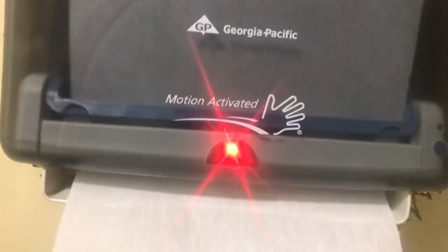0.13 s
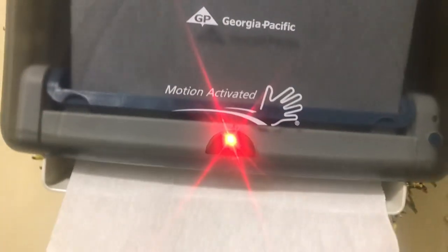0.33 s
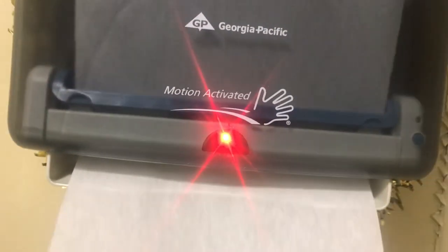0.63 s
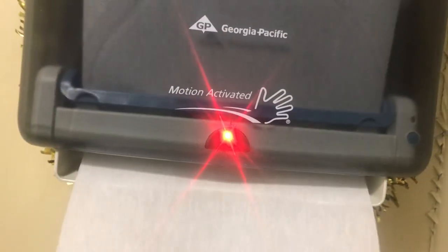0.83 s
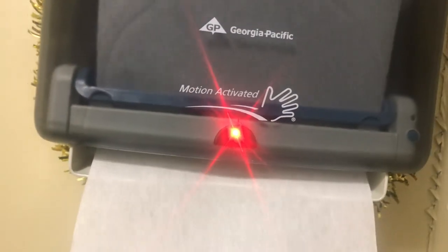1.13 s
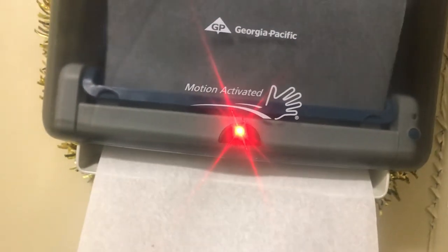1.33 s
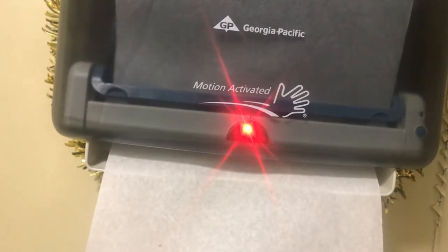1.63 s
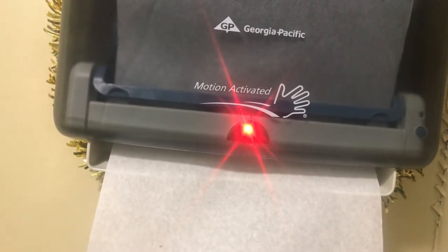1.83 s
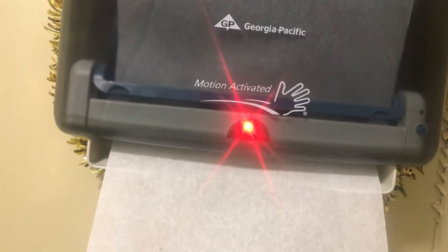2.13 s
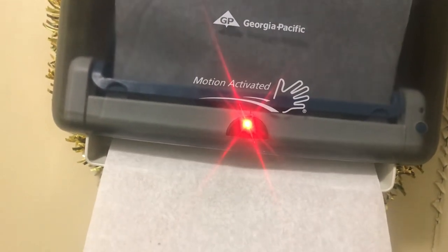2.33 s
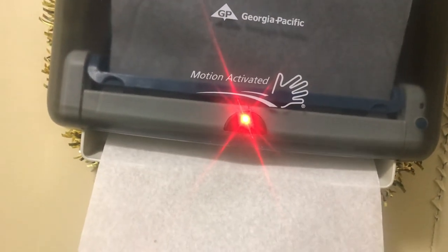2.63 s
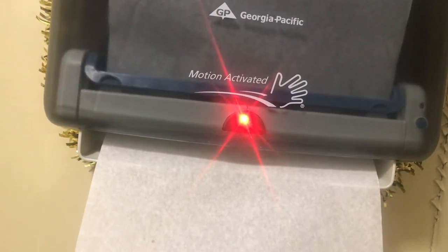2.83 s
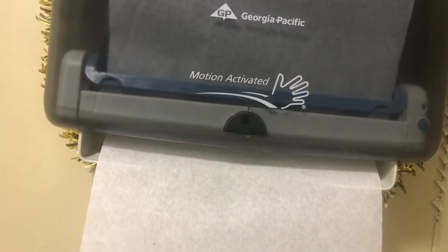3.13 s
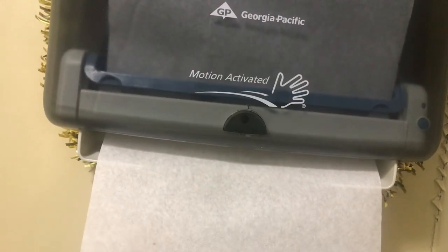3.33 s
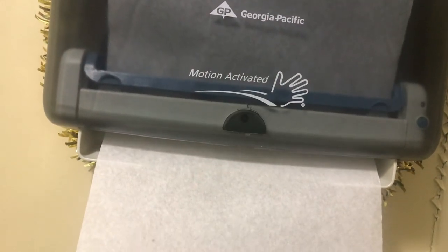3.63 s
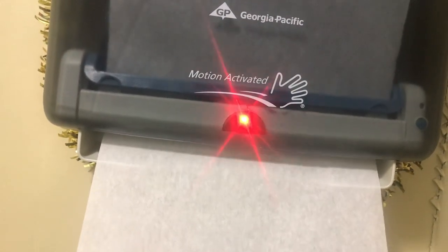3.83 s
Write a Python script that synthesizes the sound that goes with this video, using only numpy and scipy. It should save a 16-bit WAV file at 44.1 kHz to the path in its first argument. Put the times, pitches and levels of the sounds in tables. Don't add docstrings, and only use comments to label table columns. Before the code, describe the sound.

Geared dispenser motor feeds paper with a buzzing whine, winds down, followed by clicks and a brief restart

```python
import sys
import numpy as np
from scipy import signal
from scipy.fft import rfft, irfft, next_fast_len
from scipy.io import wavfile
from scipy.ndimage import map_coordinates

SR = 44100
rng = np.random.default_rng(int(sys.argv[2]) if len(sys.argv) > 2 else 0)


def bounce(signal):
    frames = np.transpose(np.atleast_2d(signal))
    limited = np.clip(frames, -1, 1)
    pcm = np.round(limited * 32767).astype(np.int16)
    wavfile.write(sys.argv[1], SR, pcm)


def magnitude_from_level(level_db):
    exponent = np.asarray(level_db, float) / 20
    return 10 ** exponent


N = 176400
T = np.arange(N) / SR
OFF_S, ON_S = 1.186, 3.872
OFF = np.clip(T - OFF_S, 0, None)
ON = np.clip(T - ON_S, 0, None)
FIRST = T < (OFF_S + ON_S) / 2
GRIP_S = 3.897
AGAIN = ~FIRST * magnitude_from_level(2.5) * np.clip((T - GRIP_S) / 0.012, 0, 1)
TEETH = 8
RATTLE_S, RATTLE_FADE_DB = 0.25, -22

# f/Hz, width/Hz, level/dB
HOUSING = [(130.3, 9.7, 6.5), (254, 24, 3), (557, 70, -3.5), (840.6, 17.4, 1), (1120, 190, 0),
           (1275, 49, 4.5), (1600, 210, -7), (2800, 150, -10.5)]


def unit(x):
    return x / np.sqrt(np.mean(x ** 2) + 1e-20)


def along(points, hz):
    f, v = np.transpose(points)
    return np.interp(np.log(hz + 1), np.log(f + 1), v)


def curves(rows):
    s, *cols = np.transpose(rows)
    return [np.interp(T, s, c) for c in cols]


def wobble(rate):
    knots = rng.standard_normal(int(N * rate / SR) + 4)
    return map_coordinates(knots, [np.arange(N) * rate / SR])


def filtered(x, response):
    m = next_fast_len(N + SR // 2)
    return irfft(rfft(x, m) * response(np.fft.rfftfreq(m, 1 / SR)), m)[..., :N]


def noise(spectrum):
    return unit(filtered(rng.standard_normal(N), lambda hz: magnitude_from_level(along(spectrum, hz))))


def resonate(x, peaks):
    def gain(f):
        total = 0
        for k, (centre, width, db) in enumerate(peaks):
            damping = 1j * f * width
            total = total + (-1) ** k * magnitude_from_level(db) * damping / (centre * centre - f * f + damping)
        return total

    return filtered(x, gain) / np.sqrt(np.mean(np.abs(gain(np.linspace(1, SR / 2, 4000))) ** 2))


def ventilation():
    # f/Hz, level/dB per Hz
    air = [(20, -71), (45, -10), (80, 1), (330, -17), (1120, -24.5), (5000, -35), (12000, -39.5),
           (16000, -38)]
    return magnitude_from_level(-62 + 0.27 * wobble(5.54)) * noise(air)


def shaft():
    # t/s, mesh f/Hz, mesh level/dB
    feed = [
        (0.01, 1110, -34.5),
        (0.052, 1127, -35),
        (0.232, 1120, -29.5),
        (0.5, 1126, -35.5),
        (0.532, 1121, -28),
        (0.728, 1120, -32.5),
        (0.922, 1131, -24.5),
        (1.026, 1129, -29),
        (1.185, 1122, -24),
    ]
    mesh_hz, mesh_db = curves(feed)
    braking = mesh_hz * np.exp(-OFF / 0.165)
    spinup = 1040 * (1 - np.exp(-ON / 0.024))
    mesh_hz = np.where(FIRST, braking, spinup)
    turn = 2 * np.pi * np.cumsum(mesh_hz / TEETH * (1 + 0.0034 * wobble(60))) / SR
    return turn, mesh_db


def mesh(turn, levels):
    total = 0
    for k, db in enumerate(levels):
        phase = (k + 1) * TEETH * turn + 1.1 * wobble(90)
        total = total + magnitude_from_level(db + 2.8 * wobble(130)) * np.sin(phase)
    return total


def mesh_whine(turn, mesh_db):
    roller_db = 0.6 * np.cos(2 * np.pi * (T - 0.28) / 0.14)
    load_db = mesh_db + roller_db - 28 * np.clip(OFF / 0.014, 0, 2)
    return FIRST * np.sqrt(2) * magnitude_from_level(load_db + 0.49 * wobble(39.84)) * np.sin(TEETH * turn)


def shaft_orders(turn):
    # order, level under the mesh/dB
    shaft_levels = [(1, -20), (2, -25.5), (3, -21), (4, -26), (6, -24.5), (7, -23), (9, -27.5), (10, -27),
                    (12, -24.5), (16, -23.5), (19, -26), (24, -29.5), (26, -35), (28, -28.5), (40, -34)]
    orders = 0
    for k, db in shaft_levels:
        phase = k * turn + (0.5 + 0.017 * k) * wobble(24.976)
        orders = orders + magnitude_from_level(db + (2 + 0.083 * k) * wobble(22.24)) * np.sin(phase)
    speed_gain = np.where(FIRST, np.exp(-OFF / 0.069), np.clip(ON / 0.052, 0, 1) ** 2)
    return np.sqrt(2) * magnitude_from_level(-30) * speed_gain * orders


def gear_hash(turn):
    # f/Hz, level/dB per Hz
    rub = [(20, -44), (50, -4.5), (130, -10.5), (400, -13), (1200, -5.5), (3000, -13.5), (6000, -17),
           (16000, -26)]
    # f/Hz, width/Hz, level/dB
    shell = [(2032, 64, -14.5), (2382, 180, -6), (2800, 230, -7), (3106, 100, -12), (3610, 100, -9.5),
             (4190, 400, -9.5), (5800, 1200, -13.5), (8420, 600, -10), (11960, 560, -14.5)]
    gears = magnitude_from_level(-42 + 0.19 * wobble(16) + 1.08 * wobble(45)) * noise(rub)
    for hz, width, db in shell:
        panel = unit(resonate(rng.standard_normal(N), [(hz, width, 0)]))
        gears += magnitude_from_level(-46 + db + 3 * wobble(30.1)) * panel
    gate = 1 + 0.058 * np.sin(turn) + 0.093 * wobble(150)
    return gate * gears


def housing_drone():
    drone = magnitude_from_level(-39 + 0.7 * wobble(40)) * resonate(rng.standard_normal(N), HOUSING)
    return (AGAIN * magnitude_from_level(-5.5) + FIRST * magnitude_from_level(RATTLE_FADE_DB * OFF / RATTLE_S)) * drone


def unloaded_glide(turn):
    peak_s, end_s = 1.234, 1.252
    swell_db = -6 * ((T - peak_s) / 0.03) ** 2 * (T < peak_s)
    release_db = -20 * np.clip((T - peak_s) / (end_s - peak_s), 0, 9) ** 2
    glide_db = -34 + swell_db + release_db + 1.5 * wobble(150)
    return np.sqrt(2) * (OFF > 0) * magnitude_from_level(glide_db) * np.sin(TEETH * turn)


def loose_gears(turn):
    coast_levels = [-48, -40, -48]
    # f/Hz, width/Hz, level/dB
    loose_peaks = [(850, 70, -4), (1120, 120, -2), (1290, 60, 3), (1610, 200, -8)]
    per_s = 2500
    knocks = (rng.random(N) < per_s / SR) * rng.uniform(-1.82, 2.17, N) * np.sqrt(SR / per_s)
    loose = magnitude_from_level(-37.5 + 1.5 * wobble(80)) * knocks
    loose += 0.25 * np.exp(-OFF / 0.2) * mesh(turn, coast_levels)
    fade = magnitude_from_level(RATTLE_FADE_DB * np.minimum(OFF / RATTLE_S, 3) ** 2.5)
    return resonate(FIRST * np.clip(OFF / 0.05, 0, 1) * fade * loose, loose_peaks)


def case_rumble():
    # f/Hz, level/dB per Hz
    case = [(60, -2), (140, -4), (300, -12), (600, -5.5), (900, -16), (3000, -36)]
    fall_db = -20 * np.minimum(OFF / 0.32, 3) ** 1.47
    level = magnitude_from_level(-43 + fall_db + 1.5 * wobble(60.2))
    return FIRST * np.clip(OFF / 0.046, 0, 1) * level * noise(case)


def restart(turn):
    start_levels = [-54, -44, -51, -54]
    sink = magnitude_from_level(-7 * np.clip((T - 3.95) * 50, 0, 1))
    growl = np.sqrt(2) * sink * mesh(turn, start_levels)
    rumble = magnitude_from_level(-45.5) * resonate(rng.standard_normal(N), HOUSING[1:3])
    return AGAIN * (growl + rumble)


def motor():
    turn, mesh_db = shaft()
    run_db = -19 * np.minimum(OFF / 0.22, 3) - 5 * (T > 1.238)
    run = FIRST * magnitude_from_level(run_db) + AGAIN
    running = mesh_whine(turn, mesh_db) + run * (shaft_orders(turn) + gear_hash(turn)) + housing_drone()
    coasting = unloaded_glide(turn) + loose_gears(turn) + case_rumble()
    return running + coasting + restart(turn)


def paper():
    # peak t/s, decay/s, level/dB, centre f/Hz
    strokes = [(1.65, 0.027, -66.5, 5000), (1.44, 0.034, -58.5, 220), (1.55, 0.038, -56, 450),
               (1.68, 0.038, -54, 183), (2.21, 0.018, -43, 1160), (2.94, 0.033, -60, 546),
               (1.86, 0.064, -67.5, 2380), (2.12, 0.018, -71, 3100), (2.3, 0.015, -63, 2500),
               (2.325, .01, -61, 6000), (2.85, 0.011, -73, 4500), (2.93, .02, -65, 1490),
               (3.01, .008, -68.5, 4360), (3.14, .02, -71, 1800), (3.19, .015, -68, 1800),
               (3.25, .012, -66.5, 1900), (3.35, 0.03, -63, 1750), (3.37, 0.024, -73, 4770),
               (3.4, 0.0063, -69, 2500), (3.49, 0.061, -63.5, 3900), (3.49, 0.044, -74, 6150),
               (3.7, 0.022, -65, 900), (3.725, 0.052, -71, 1800), (3.79, 0.029, -67, 1500),
               (3.81, .02, -67, 2720), (3.88, 0.016, -50.5, 4000)]
    # peak t/s, decay/s, level/dB, centre f/Hz
    creases = [(1.228, 0.017, -45.5, 5960), (1.293, 0.031, -50, 5800), (1.39, 0.0068, -54, 4440),
               (1.503, 0.0022, -47, 4900), (2.121, .004, -65, 10000), (2.179, .003, -35.5, 12300),
               (2.201, 0.0032, -41, 5400), (2.29, 0.0024, -73, 7000), (2.336, 0.0055, -40, 8660),
               (2.823, 0.0071, -56, 1810), (2.913, 0.0026, -70, 3000), (2.936, 0.0027, -59.5, 3600),
               (2.978, 0.0044, -61, 2180), (2.988, .004, -57, 1500), (3.598, .015, -62.5, 3000),
               (3.089, .002, -61, 1800), (3.127, .003, -59, 1500), (3.594, 0.011, -60, 4570),
               (3.615, 0.04, -53, 4440), (3.679, 0.0035, -49, 1510), (3.686, 0.0035, -64, 2500),
               (3.749, 0.009, -50, 4170), (3.755, 0.0046, -37, 11700), (3.772, 0.0049, -44, 4960),
               (3.775, 0.0047, -34, 2800), (3.79, .004, -42, 1600)]
    out = np.zeros(N)
    crinkle_db = 1.5 * wobble(250)
    for rows, rise, octaves in (strokes, 0.6, 0.53), (creases, 0.12, 0.59):
        for s, decay, db, centre_hz in rows:
            part = slice(int((s - 0.15) * SR), int((s + 0.3) * SR))
            u = (T[part] - s) / decay
            hz = np.fft.rfftfreq(len(u), 1 / SR)
            bell = np.exp(-(np.log2((hz + 1) / centre_hz) / octaves) ** 2 / 2)
            hiss = unit(irfft(rfft(rng.standard_normal(len(u))) * bell, len(u)))
            envelope = np.where(u < 0, np.exp(-(u / rise) ** 2), np.exp(-u))
            out[part] += magnitude_from_level(db + crinkle_db[part]) * envelope * hiss
    return out


def sleeve():
    # t/s, level/dB
    effort = [(1.45, -67.5), (1.7, -60), (1.98, -70.5), (2.15, -56.5), (2.27, -55.5), (2.33, -51),
              (2.41, -50), (2.5, -67), (2.6, -74.5), (2.9, -69.5), (3.03, -76), (3.17, -67.5), (3.3, -71.5),
              (3.67, -71), (3.74, -46), (3.82, -53), (3.86, -50.5)]
    # f/Hz, level/dB per Hz
    rustle = [(150, 7.5), (500, -2), (1500, 2), (4000, -9.5), (9000, -22.5), (16000, -24)]
    effort_db, = curves(effort)
    flutter_db = 2 * wobble(25) + 2 * wobble(150)
    return np.clip((T - 1.4) / 0.1, 0, 1) * magnitude_from_level(effort_db + flutter_db) * noise(rustle)


def latch():
    # f/Hz, level/dB, t60/s
    modes = [(300, -4, .1), (465, 0, .065), (620, -8, .09), (1530, -1, .1), (2400, -14, .03)]
    t = np.clip(T - 1.5025, 0, None)
    ring = sum(magnitude_from_level(db - 60 * t / t60) * np.sin(2 * np.pi * hz * t) for hz, db, t60 in modes)
    return magnitude_from_level(-36.5) * (1 - np.exp(-t / 0.0013)) * ring


def clicks():
    # t/s, peak level/dB (unused), thud level/dB, body level/dB, tick level/dB
    contacts = [(1.504, -47, -46, -53, -72), (1.674, -40, -61, -58, -65), (1.929, -45, -55, -58.5, -61),
                (2.007, -45, -56, -62, -62), (2.027, -35, -75, -73, -66), (2.16, -30, -52, -40, -51),
                (2.18, -26, -51, -43, -41.5), (2.201, -24, -39, -37, -63), (2.334, -24, -75, -44.5, -42),
                (2.358, -19, -43, -26.5, -29), (2.825, -48, -57.5, -72, -85), (2.946, -49, -60, -84, -85),
                (2.978, -45, -55.5, -70, -83), (3.678, -31, -51.5, -67, -62), (3.731, -33, -54, -58, -50),
                (3.755, -26, -45.5, -41, -48), (3.775, -24, -38, -39, -57),
                (3.877, -34, -40.5, -39.5, -44.5)]
    # f/Hz, width/Hz, level/dB
    thud = [(232, 130, 0.5), (496, 165, -2), (930, 425, -5)]
    body = [(1550, 440, 5.5), (2220, 660, 5), (2800, 840, 5), (4000, 1630, -1.5)]
    tick = [(6240, 8000, -0.5), (10000, 8000, 3.5), (14500, 4700, -1.5)]
    part_db = [3, 4.5, 8.5]
    t, out = np.arange(SR // 5) / SR, np.zeros(N)
    for k, (peaks, t60) in enumerate([(thud, 0.09), (body, 0.043), (tick, 0.013)]):
        drive = np.zeros(N + SR)
        for row in contacts:
            scrape = magnitude_from_level(-60 * t / t60) * (1 - np.exp(-t / 0.0016)) * rng.standard_normal(len(t))
            drive[round(row[0] * SR):][:len(t)] += magnitude_from_level(row[2 + k] + part_db[k]) * scrape
        out += resonate(drive[:N], peaks)
    return out


def room(x):
    # f/Hz, t60/s
    decay = [(200, 0.43), (2000, 0.12), (10000, 0.12)]
    turns = [0, 2.17, 2.19, 2.3, 2.35, 3, 3.74, 3.77, 4]
    out = np.zeros(N)
    for start, end in zip(turns, turns[1:]):
        hz, t, z = signal.stft(rng.standard_normal(SR // 2), SR, nperseg=256)
        fading = z * magnitude_from_level(-60 * t / along(decay, hz)[:, None])
        tail = signal.istft(fading, SR, nperseg=256)[1]
        stretch = np.pad(x * (T >= start) * (T < end), (200, 0))
        out += signal.fftconvolve(stretch, tail / np.linalg.norm(tail))[:N]
    return out


def scene():
    hits = clicks()
    mix = ventilation() + motor() + paper() + sleeve() + latch() + hits + magnitude_from_level(-5) * room(hits)
    return mix[None]


def roll_off(x):
    return signal.sosfilt(signal.butter(12, 16830, fs=SR, output="sos"), x)


def record(dry):
    mix = filtered(dry, lambda hz: 1 / (1 + (hz / 15800) ** 60))
    return roll_off(mix)


dry = scene()
out = record(dry)
bounce(out)
```